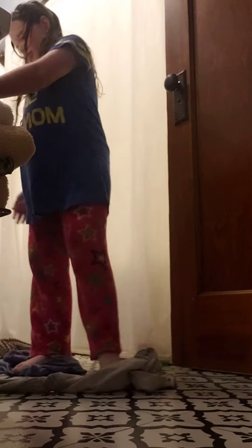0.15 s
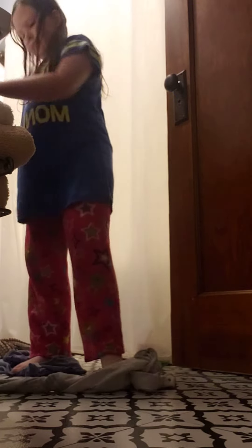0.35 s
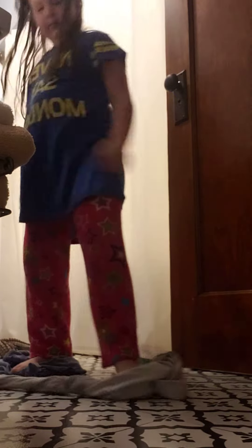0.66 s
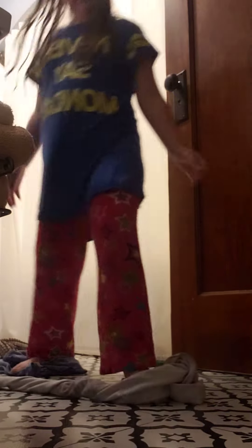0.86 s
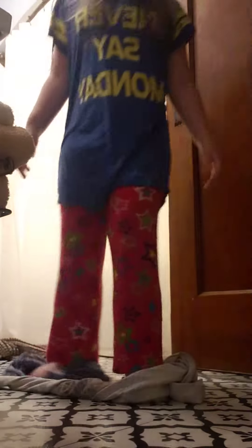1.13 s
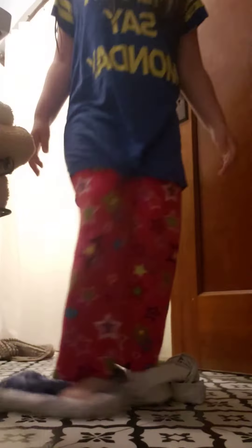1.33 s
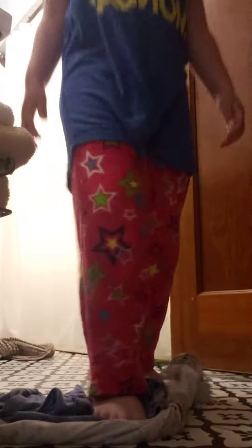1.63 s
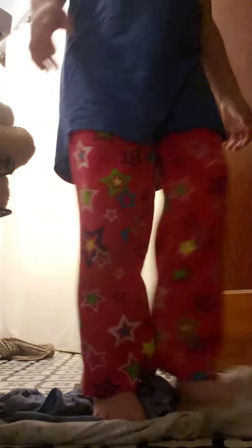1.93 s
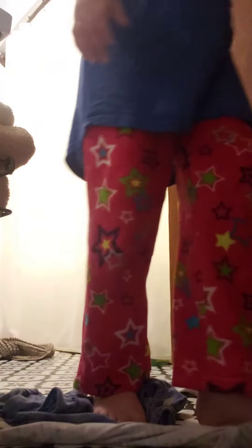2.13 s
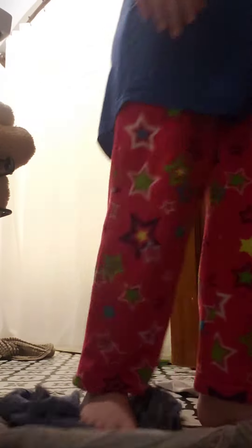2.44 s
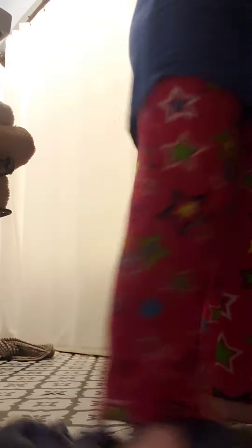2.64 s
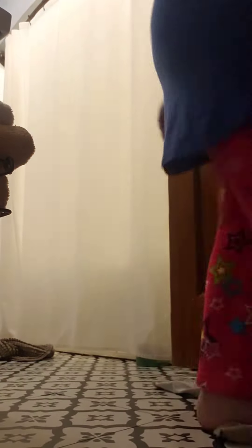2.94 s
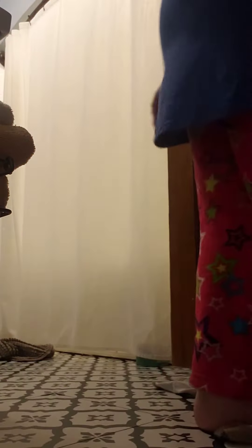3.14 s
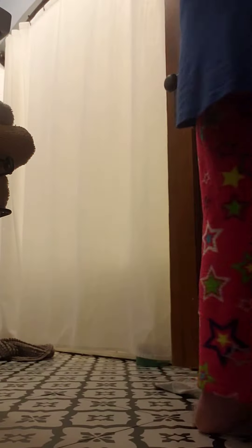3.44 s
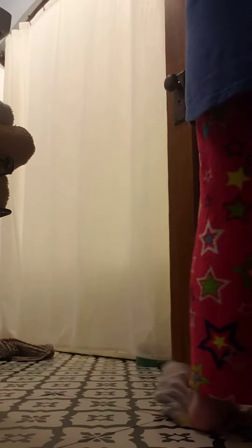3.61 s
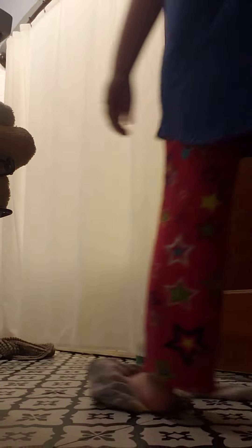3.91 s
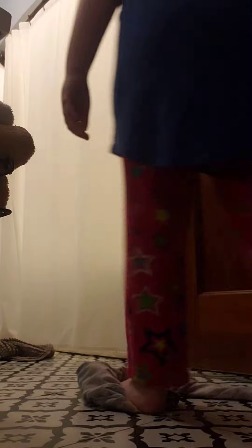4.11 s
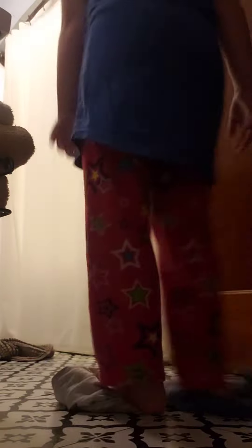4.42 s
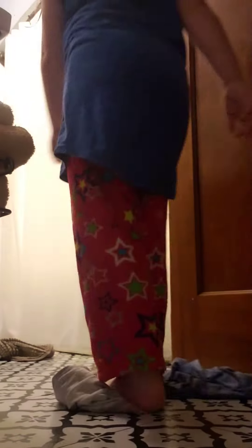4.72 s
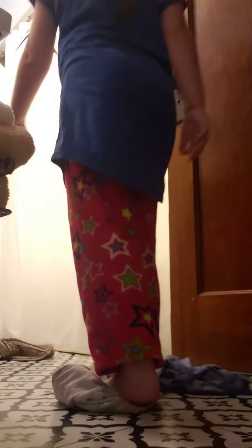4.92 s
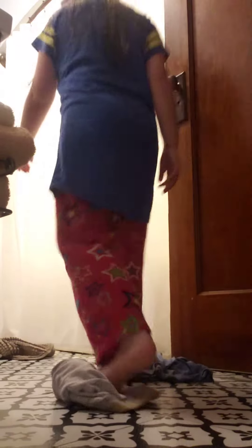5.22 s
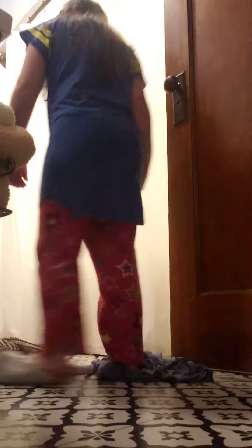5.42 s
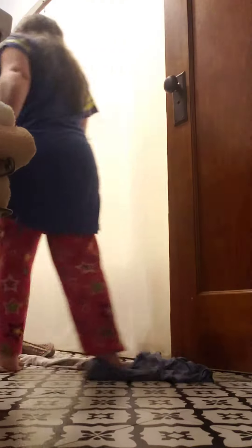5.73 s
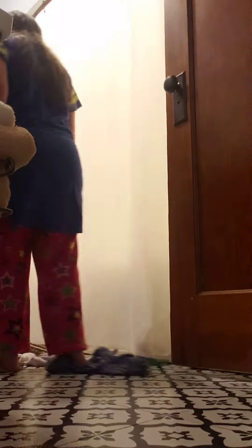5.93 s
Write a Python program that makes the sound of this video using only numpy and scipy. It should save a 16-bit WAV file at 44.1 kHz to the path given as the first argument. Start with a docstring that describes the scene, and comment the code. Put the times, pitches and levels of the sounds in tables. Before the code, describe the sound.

A steady low extractor-fan hum with soft airy rumble runs throughout, its tone swelling slightly, in a small tiled bathroom heard from a microphone on the floor. From 0 s, cloth rubs softly over tile in short hissing shuffles, with a faint low heel thud around 0.9 s. At 1.3-1.5 s a sole scuffs more roughly, followed by light dragging and a tiny tick at 2.3 s. From 2.5 to 3 s the cloth bunches up in a fuller, rising rustle, with a sharp hard tick near 2.87 s and soft thuds. A thin high swish sinks away from 3.2 to 3.8 s. Quieter rubs and muffled footfalls continue, with a small clear tick and grittier shuffle around 4.4 s and a thud at 4.7 s. At about 5.56 s comes a crisp, bright scrape, then at 5.66 s one hard, deep heel thud that briefly resonates. Faint rubbing and fan hum remain until about 6 s.

```python
"""Cloths pushed over bathroom tiles

Bare feet push cloths over a tiled bathroom floor, close to a phone that stands on the tiles.
An extractor fan hums at multiples of twice the mains, and its air noise rings the room's modes.
Cloth fibres hiss and drag as shaped noise, a sole scuffs, and hard ticks and brief scuffs ring tile modes.
Heels thud as pushes on a ringing floor, once hard; bands of noise glide as a heap bunches and a cloth
swishes away."""
import sys
import numpy as np
from scipy import signal
from scipy.fft import rfft, irfft, next_fast_len
from scipy.io import wavfile
from scipy.ndimage import uniform_filter1d

SR = 44100
rng = np.random.default_rng(int(sys.argv[2]) if len(sys.argv) > 2 else 0)


def master(y):
    """Save y as 16-bit WAV."""
    cut = np.clip(np.atleast_2d(y).T, -1, 1)
    pcm = np.round(cut * 32767)  # scale
    wavfile.write(sys.argv[1], SR, pcm.astype(np.int16))


N = 267246
T = np.arange(N) / SR  # s
FFT_SIZE = next_fast_len(N + SR)
LOG_HZ = np.log(np.arange(FFT_SIZE // 2 + 1) * SR / FFT_SIZE + 1)  # the 1 Hz keeps the log finite
HZ = np.exp(LOG_HZ)


def undb(db):
    """Decibels to amplitude."""
    return 10 ** (np.asarray(db) / 20)


def level(x, db):
    """Set the RMS level of all rows together."""
    return x * undb(db) / np.sqrt(np.mean(x ** 2))


def along(table, axis=1):
    """One column of a table, interpolated over every frequency on a log scale."""
    table = np.array(table, float)
    return np.interp(LOG_HZ, np.log(table[:, 0]), table[:, axis])


def colour(x, gain):
    """Filter each row by a gain over frequency."""
    return irfft(rfft(x, FFT_SIZE) * gain, FFT_SIZE)[..., :N]


def walk(rate):
    """Random levels held 1 / rate s and slewed twice; spread near 1."""
    hold = int(SR / rate)
    steps = np.repeat(rng.standard_normal(N // hold + 1), hold)
    return 1.3 * uniform_filter1d(uniform_filter1d(steps, hold), hold)[:N]


def ring(x, hz, t60):
    """A mode that decays 60 dB in t60 seconds."""
    pole = np.exp(2j * np.pi * hz / SR - np.log(1000) / (t60 * SR))
    return signal.lfilter([1], [1, -pole], x).imag


MOTOR_HZ = 119.97  # twice the mains
# steady hum lines of the fan motor: (multiple of MOTOR_HZ, mean level [dB])
HUM_LINES = [(1, -45.5), (2, -54.5), (4, -64.5), (5, -70.5), (6, -73)]
# uneven slow swells of the third hum line and the low rumble:
# (time [s], mean level of the third hum line [dB], mean level of the two lowest modes [dB])
SLOW_SWELLS = [(0, -50, -49), (.7, -48, -45), (1.4, -50, -47.5), (2.1, -54.5, -46), (2.8, -52, -45.5),
               (3.4, -46, -43), (3.9, -46.5, -47), (4.5, -54.5, -45), (5.1, -48.5, -48), (6.06, -48.5, -46)]
THIRD_FADES_PER_S, THIRD_FADE_DEPTH = 14, .45  # the third hum line fades in and out
LOW_SWELL_DB = 2
# spectrum of the broad air noise: (frequency [Hz], relative level [dB per Hz])
AIR_SPECTRUM = [(15, -43), (25, -17), (127, -4.5), (190, -10), (373, -8), (439, -20), (607, -19),
                (818, -38), (936, -22.5), (1400, -43), (3340, -58.5), (6740, -64), (8360, -55.5),
                (9570, -71), (16000, -48)]
AIR_DB = -46.5
# room and duct modes rung by the air; of the lowest two only the balance counts here:
# (frequency [Hz], width [Hz], level [dB])
ROOM_MODES = [(59.6, 2.1, -52), (72.7, 7.1, -48), (94.4, 22, -49.5), (118.4, 6.4, -55), (144.64, 5.6, -49),
              (156.8, 2.1, -55), (230.8, 9.3, -53.5), (257.8, 9, -57.5), (286, 11, -58), (303, 5.3, -63.5),
              (328.1, 5.4, -56.5), (359.3, 7.7, -54.5), (395.05, 6, -50), (437, 25, -61.5),
              (490, 70, -63.5), (531, 23.6, -64), (603.6, 34.5, -64.5), (766, 41, -70.5), (938, 117, -64.5),
              (1073, 115, -68), (1740, 170, -81.5)]


def fan():
    """Motor hum that wavers, broad air noise, and the same kind of air noise ringing each mode."""
    times, *columns = np.transpose(SLOW_SWELLS)
    third_db, low_db = (np.interp(T, times, column) for column in columns)
    fade = np.abs(1 + THIRD_FADE_DEPTH * walk(THIRD_FADES_PER_S))
    third_db = third_db + 20 * np.log10(fade + 0.0008)
    low_db = low_db + LOW_SWELL_DB * walk(2.97)

    hum = 0
    for multiple, db in HUM_LINES + [(3, third_db)]:
        # the room's air shifts each line a little in level and phase
        turns = multiple * MOTOR_HZ * T + rng.random() + .04 * walk(12)
        amplitude = np.sqrt(2) * undb(db + 0.46 * walk(7.3))
        hum = hum + amplitude * np.sin(2 * np.pi * turns)

    powers = []
    for mode_hz, width, db in ROOM_MODES:
        powers.append(undb(db) ** 2 / width / (1 + ((HZ - mode_hz) * 2 / width) ** 4))
    low_gain = np.sqrt(sum(powers[:2]) * SR / 2)
    upper_gain = np.sqrt(sum(powers[2:]) * SR / 2)
    low_modes = level(colour(rng.standard_normal((2, N)), low_gain), 0)
    upper_modes = colour(rng.standard_normal((2, N)), upper_gain)
    air = level(colour(rng.standard_normal((2, N)), undb(along(AIR_SPECTRUM))), AIR_DB)
    return hum + undb(low_db) * low_modes + upper_modes + air


def fibres(spectrum, scatter_db, flutter_db, rate):
    """Dense snags of uneven but bounded size, in a grip that keeps changing."""
    size = np.minimum(rng.exponential(size=N), 5)
    snags = rng.standard_normal((2, N)) * undb(scatter_db * size + flutter_db * walk(rate))
    return level(colour(snags, undb(along(spectrum))), 0)


# spectra of cloth on tile, heard close: each (frequency [Hz], relative level [dB per Hz])
# surface fibres, fine nap, weave rasp, grit under the cloth, weighted heap
HISS_SPECTRUM = [(3000, -28), (7000, -3), (9000, -1), (11000, -4.5), (13000, -1), (16000, -10.5)]
NAP_SPECTRUM = [(6000, -29), (10000, -12.5), (12500, -7.5), (16000, -8)]
RASP_SPECTRUM = [(3500, -20.5), (5000, -9), (6000, -1.5), (7000, 2), (10000, -41)]
GRIT_SPECTRUM = [(1500, -8), (2800, -9.5), (3600, 0), (4600, 0), (5600, -1.5), (7000, -16)]
DRAG_SPECTRUM = [(200, -21), (500, -1.5), (1000, 1.5), (1700, -2), (2500, -10), (3500, -11.5),
                 (6000, -30.5)]
# one row per shuffle of a cloth; rises under .005 and falls under .04 count as those:
# (time at full speed [s], rise [s per 10 dB], hold [s], fall [s per 10 dB], fibre hiss [dB],
#  fine nap [dB re hiss], grit [dB re hiss], heavy drag [dB re hiss])
CLOTH_SHUFFLES = [(0.0, .05, .02, 0.3, -73, -2, -5, 3.5), (0.356, -1.3, 0.0088, 0, -79, -5, -7, 3),
                  (0.53, .04, .04, .3, -73, 2, -20, -4), (1.034, 0.15, 0.11, 0.2, -73, -1, -9, -29),
                  (1.272, .008, .1, 0.26, -71, -10, 3, 4), (1.4, .06, 0.08, 0.06, -72.5, -6, 4, 11),
                  (1.67, 0.74, 0.0089, -0.8, -72, -17, -14.5, 3.5),
                  (1.877, 0.3, .005, 0, -69.5, -6, -8, 7.5), (1.929, 0.03, 0.084, -0.1, -68.5, 0, -3, 6.5),
                  (2.076, 0.14, 0.022, 0.23, -70, 2, -1, 2), (2.595, 0.09, 0.1, 0.18, -64, 4.5, -4.5, -2.5),
                  (2.751, 0.05, 0.047, 0.16, -63.5, 4, 2, 5), (2.821, -0.04, 0.02, 0.06, -65, 7, 3, 7),
                  (2.863, -0.03, 0.01, 0.0738, -59.5, 3.5, 3.5, 5.5),
                  (2.91, .03, 0.069, 0.07, -62, -2, 2, 5.5), (3.06, 0.06, 0.025, 0.37, -73.5, 1, 3, 6),
                  (3.222, 0.14, .06, 0.26, -69, 4.5, 1.5, 0.5),
                  (3.53, 0.3, 0.065, 0.23, -72, 0, -8.5, -4.5),
                  (4.01, 0.6, 0.0085, 0.5, -75.5, 2, -19, -22.5),
                  (4.22, 0.06, 0.024, -0.13, -72.5, -4, 2, 7), (4.3, 0.1, .02, .06, -82, -6, -5, 7),
                  (4.376, 0.28, 0.048, 0.16, -69, -3, -2, -5), (4.44, 0.07, 0.036, 0.07, -65.5, -3, 2, 6),
                  (4.838, 0, 0.037, -0.5, -78, 0, -5, -3), (5.15, 0.4, 0.02, 1, -73, -1.5, -6, 2),
                  (5.388, .01, 0.017, .05, -76, -5, 8, 5), (5.562, .005, 0.025, .045, -54, -5, 2, -12),
                  (5.435, -0.13, 0.028, 0.3, -75.5, 1.5, -4, 11.5),
                  (5.626, -0.1, 0.021, 0.25, -71, -5, -3.5, 2.5),
                  (6.027, 0.1, .02, 4, -73.5, -5.5, -2.5, 4.5)]
# cloth stirring between shuffles: (hiss [dB], nap [dB], grit [dB], drag [dB])
STIRRING = (-99, -85, -83.5, -71.5)
STILL_S, STILL_WIDTH_S, STILL_DB = 1.93, 0.36, -13  # the stirring dies away for a moment
# level of the rasp when the hiss is at RASP_HISS_DB, and dB gained per dB of hiss
RASP_DB, RASP_HISS_DB, RASP_GROWTH = -74, -74, 0.7


def cloth():
    """Surface fibres and the fine nap hiss, the weave rasps, grit scratches, the weighted heap drags."""
    stillness_db = STILL_DB * np.exp(-((T - STILL_S) / STILL_WIDTH_S) ** 2)
    power = undb(np.array(STIRRING)[:, None] + stillness_db) ** 2
    for s, rise, hold, fall, db, nap_db, grit_db, drag_db in CLOTH_SHUFFLES:
        before = np.maximum(s - T, 0) / max(rise, .005)
        after = np.maximum(T - s - hold, 0) / max(fall, .04)
        speed_db = -10 * (before + after)
        layer_db = db + np.array([[0], [nap_db], [grit_db], [drag_db]])
        power = power + undb(layer_db) ** 2 * undb(speed_db) ** 2
    hiss, nap, grit, drag = np.sqrt(power)
    rasp = undb(RASP_DB) * (hiss / undb(RASP_HISS_DB)) ** RASP_GROWTH

    rub = hiss * fibres(HISS_SPECTRUM, 3.0, 1.0, 40)
    rub += nap * fibres(NAP_SPECTRUM, 4.5, 1.4, 40)
    rub += rasp * fibres(RASP_SPECTRUM, 3.3, 0.98, 40)
    rub += grit * fibres(GRIT_SPECTRUM, 3.2, 1.6, 40)
    rub += drag * fibres(DRAG_SPECTRUM, 3.0, 2.0, 60)
    return rub


# a heel lands: (time [s], force of the push [dB], length of the push [s])
HEEL_LANDINGS = [(0.88, -36.5, 0.0067), (2.63, -40, 0.0072), (2.929, -38, 0.0071), (3.4, -37.5, 0.0077),
                 (3.819, -44, 0.012), (4.061, -39, 0.0089), (4.689, -34.5, 0.0089), (5.291, -37, 0.0094),
                 (5.66, -20, 0.0064)]
FLOOR_HZ, FLOOR_T60_S = 71.5, .125
LINGER_HZ, LINGER_T60_S, LINGER_DB = 76, .6, -21  # the room's low mode rings on after a thud


def heels():
    """A soft push shakes the joists, which shake the floor: a low swing swells and dies, the room rings on."""
    force = np.zeros(N)
    for s, db, push in HEEL_LANDINGS:
        shape = np.hanning(int(push * SR))
        start = int(s * SR)
        force[start:start + len(shape)] += undb(db) * shape / shape.sum()
    # crest of the doubled ring after a unit impulse
    peak = FLOOR_T60_S * SR / (2 * np.e * np.log(1000))
    joists = ring(force, FLOOR_HZ, FLOOR_T60_S)
    floor = ring(joists, FLOOR_HZ, FLOOR_T60_S) / peak
    return floor + undb(LINGER_DB) * ring(floor, LINGER_HZ, LINGER_T60_S) / (2 * peak)


def glide(table, width_hz, broken_db, rate):
    """A band of noise that follows a moving centre, broken as the folds slip."""
    times, centre_hz, db = np.transpose(table)
    phase = 2 * np.pi * np.cumsum(np.interp(T, times, centre_hz)) / SR
    lowpass = 1 / (1 + (HZ * 2 / width_hz) ** 4)
    rows = []
    for _ in range(2):
        band = colour(rng.standard_normal((2, N)), lowpass)
        rows.append(band[0] * np.cos(phase) + band[1] * np.sin(phase))
    path_db = np.interp(T, times, db, left=-120, right=-120)
    return level(np.array(rows), 0) * undb(path_db + broken_db * walk(rate))


# a sole rubs its cloth hard along the tile: (time [s], centre [Hz], mean level [dB])
SCUFF_PATH = [(1.262, 1800, -88), (1.272, 1800, -69), (1.33, 1800, -70), (1.4, 1600, -64),
              (1.47, 1600, -67), (1.54, 2300, -74), (1.58, 2300, -88)]


def scuff():
    """The rubbing sole makes a broad, strongly broken band of noise."""
    return glide(SCUFF_PATH, width_hz=1700, broken_db=3.5, rate=90)


# modes of a tile: (frequency [Hz], width [Hz], relative level [dB])
TILE_MODES = [(1130, 100, -2), (1300, 100, -2), (1660, 150, 3), (2000, 200, -4), (2400, 300, -6),
              (2900, 500, -6), (3500, 700, -5), (4500, 800, -4), (6500, 2000, -6), (10000, 3000, -15)]
# hard ticks and brief soft or sharp scuffs on tile, levels before the room and the microphone:
# (time [s], peak level [dB], brightness [dB per octave], left minus right [dB], scrape [s])
TILE_CONTACTS = [(1.271, -58, -9, 5, .015), (1.4, -50, -10, 3, .001), (2.265, -66, 4, 2, .0005),
                 (2.313, -49, 6, 11, 0.00057), (2.8659, -31.5, -7, 1, .0001), (4.02, -62, 2, 4, .008),
                 (4.208, -56, -7, 8, .025), (4.3, -60, -6, 4, .01), (4.42, -55, -6, 3, .004),
                 (4.462, -40, -3, 2, .0001), (4.828, -55, 7, 6, .001), (5.22, -53, -12, -6.5, 0.0096),
                 (5.386, -54, 2, 6, .012), (5.556, -56, 3, 0, .025), (5.67, -56, -8, 0, 0.0075)]


def ticks_and_scuffs():
    """A sudden contact that scrapes on for a moment rings the tile's modes, each with its own brightness."""
    out = np.zeros((2, N))
    t = T[:SR // 5]
    for s, db, bright_db, pan_db, scrape in TILE_CONTACTS:
        modes = 0
        for hz, width, mode_db in TILE_MODES:
            gain = undb(mode_db + bright_db * np.log2(hz / 2000)) * width
            modes = modes + gain * np.sin(2 * np.pi * hz * t) * np.exp(-np.pi * width * t)
        contact = rng.standard_normal(len(t)) * np.exp(-t / scrape)
        contact[0] = 3  # the first touch is always firm
        sound = signal.fftconvolve(contact, modes)[:len(t)]
        sides_db = db + np.array([[pan_db], [-pan_db]]) / 2
        start = int(s * SR)
        out[:, start:start + len(t)] += undb(sides_db) * sound / np.abs(sound).max()
    return out


# the heap bunches up and the hollow under it shrinks: (time [s], hollow [Hz], mean level [dB])
BUNCH_PATH = [(2.55, 283, -58), (2.62, 290, -47), (2.7, 300, -49), (2.74, 450, -49), (2.77, 490, -45),
              (2.8, 500, -47), (2.815, 780, -51), (2.84, 780, -53), (2.87, 750, -59), (2.96, 700, -56),
              (3.0, 650, -64)]


def bunching():
    """The shrinking hollow is a band of noise whose centre climbs, then sinks a little."""
    return glide(BUNCH_PATH, width_hz=430, broken_db=3.5, rate=70)


# a cloth swishes away and its hiss sinks as it slows: (time [s], centre [Hz], mean level [dB])
SWISH_PATH = [(3.19, 14000, -88), (3.25, 13800, -70), (3.32, 13300, -65), (3.45, 12300, -68),
              (3.6, 11300, -72.5), (3.75, 10300, -79), (3.85, 9800, -90)]


def swish():
    """The slowing cloth is a high band of noise whose centre sinks."""
    return glide(SWISH_PATH, width_hz=3000, broken_db=1.2, rate=40)


# likeness of the two microphone ports:
# (frequency [Hz], likeness [0-1], phase by which left leads [rad])
PORT_LIKENESS = [(62.4, 0.98, 0.51), (304, 0.95, 0.17), (573, 0.91, 0.52), (857, 0.44, 3.07),
                 (1600, 0.75, 4.06), (2470, 0, 3.7), (3980, 0.08, 4.9), (16000, 0, 7.9)]


def pair(x):
    """Two rows become what two ports hear: mostly alike in the bass, apart in the treble."""
    like = np.clip(along(PORT_LIKENESS), 0, .999)
    lag = np.exp(-1j * along(PORT_LIKENESS, axis=2))
    right = colour(x[0], like * lag) + colour(x[1], np.sqrt(1 - like ** 2))
    return np.array([x[0], right])


TAIL_T60_S, TAIL_DB = .25, -9


def tail(x):
    """Tiled walls give back a short bright tail, another to each row."""
    t = T[:SR // 2]
    decay = np.exp(-np.log(1000) * t / TAIL_T60_S)
    walls = rng.standard_normal((2, len(t))) * decay * (t > .003)
    walls *= undb(TAIL_DB) / np.sqrt(np.sum(walls ** 2, axis=1, keepdims=True))
    return x + signal.fftconvolve(x, walls, axes=1)[:, :N]


def scene():
    """Rubs, ticks and scuffs get the tiled tail; fan, bunching heap and heels go without it."""
    rubs = pair(cloth() + scuff() + swish())
    return tail(rubs + ticks_and_scuffs()) + pair(fan() + heels() + bunching())


# two microphone ports: (frequency [Hz], left gain [dB], right gain [dB])
PORT_COLOUR = [(60, 0, 0), (373, 0, -2), (846, 2, 4), (1310, 4.5, -5.5), (1850, 5, -6.5), (2920, 3.5, 3),
               (3250, -2, -6.5), (6500, 4.5, -0.5), (7700, 1, -24), (8200, -8, -22), (9000, -16, 4.5),
               (9400, -0.5, 10.5), (12700, -2, 1.5), (17100, 7, 7.5)]
BASS_CUT_HZ, TOP_HZ = 29, 15760


def record(dry):
    """Each port has its own colour with a notch near 8 kHz; the phone cuts the deep bass and the top."""
    dry = dry * np.minimum(T / .004, 1)  # the sound opens without a click
    heard = colour(dry, undb([along(PORT_COLOUR), along(PORT_COLOUR, axis=2)]))
    bass_cut = signal.butter(2, BASS_CUT_HZ, "high", fs=SR, output="sos")
    top_cut = signal.ellip(12, .2, 80, TOP_HZ, fs=SR, output="sos")
    return signal.sosfilt(top_cut, signal.sosfilt(bass_cut, heard))


dry = scene()
out = record(dry)
master(out)
```